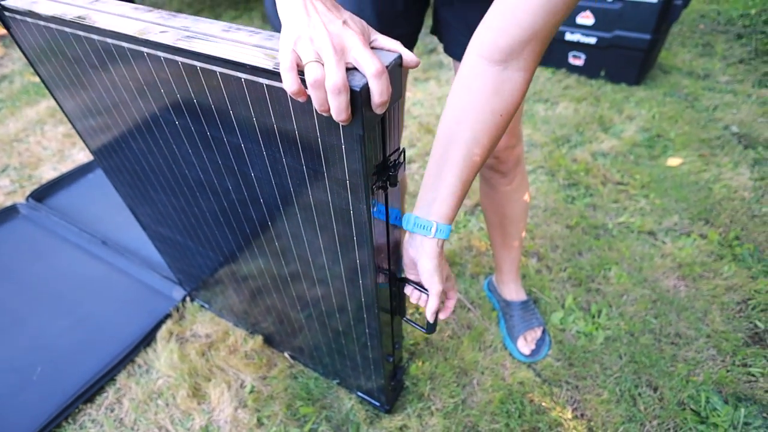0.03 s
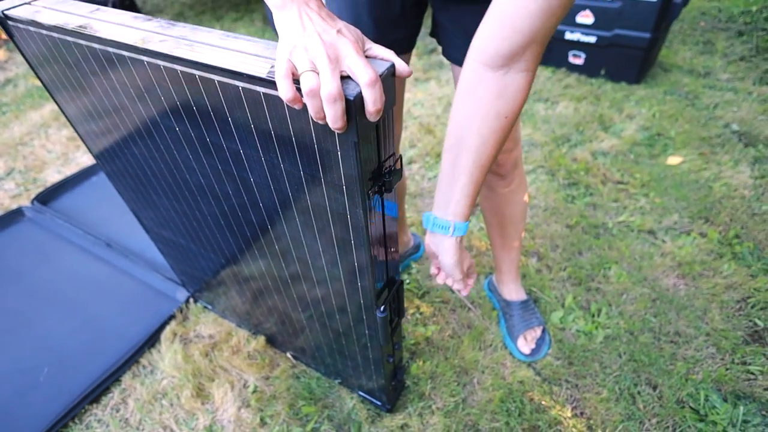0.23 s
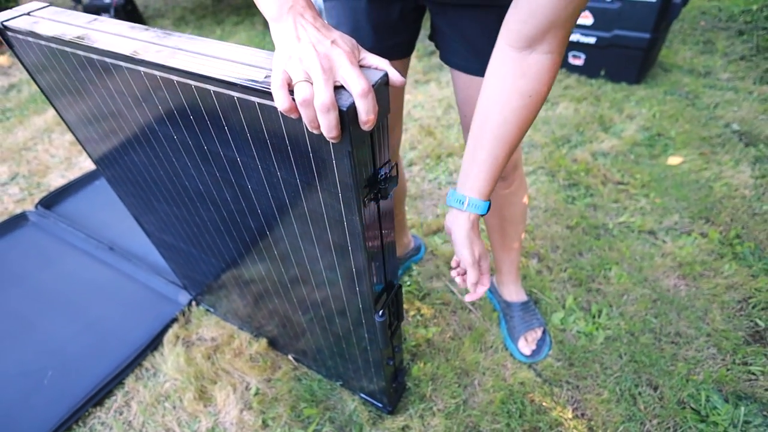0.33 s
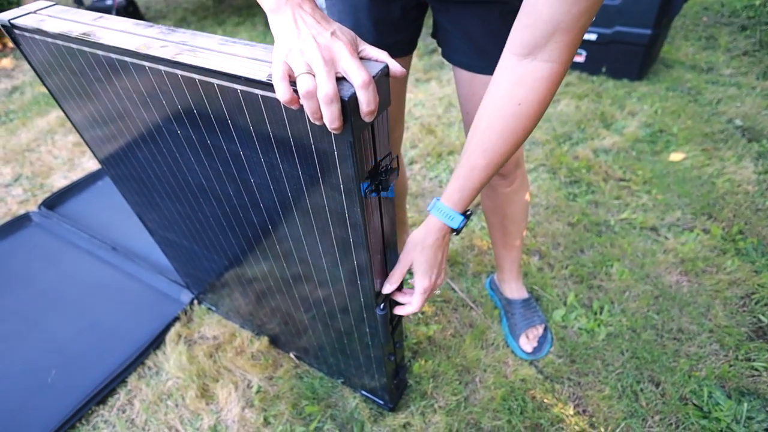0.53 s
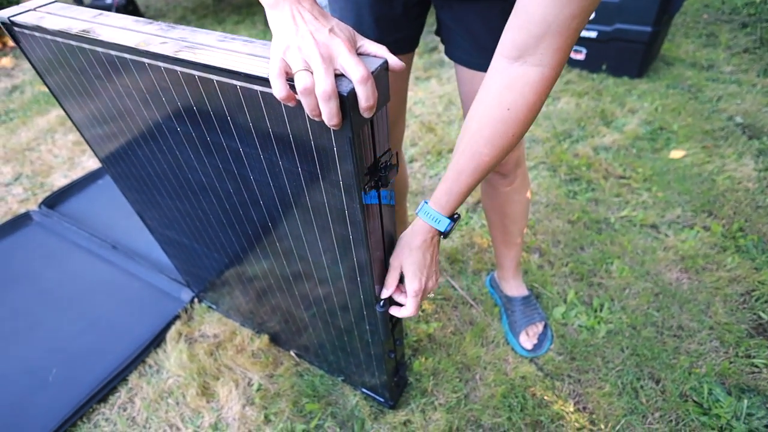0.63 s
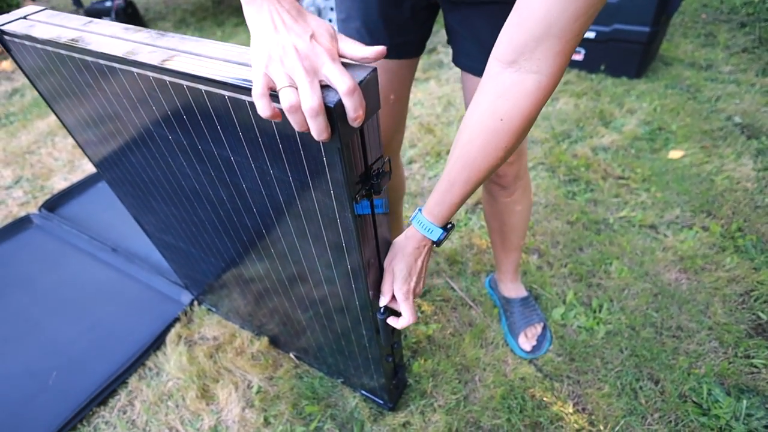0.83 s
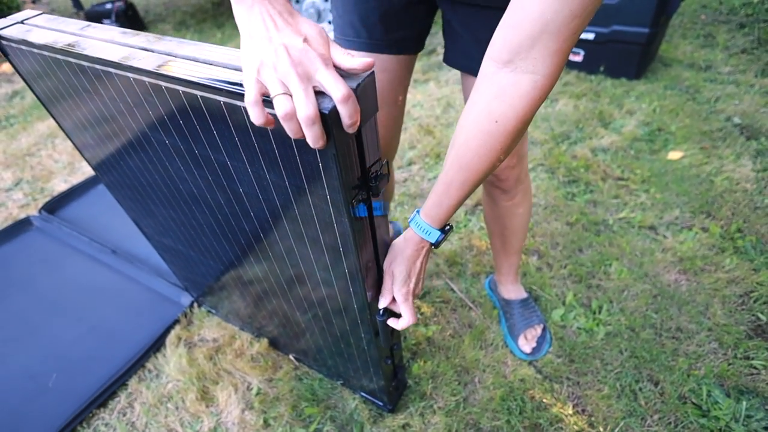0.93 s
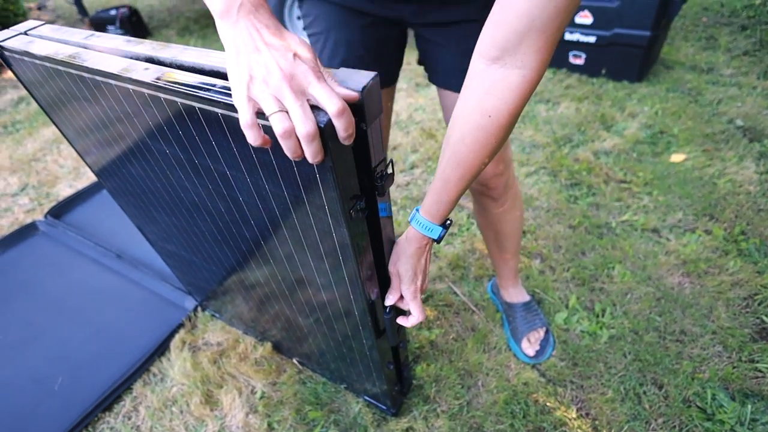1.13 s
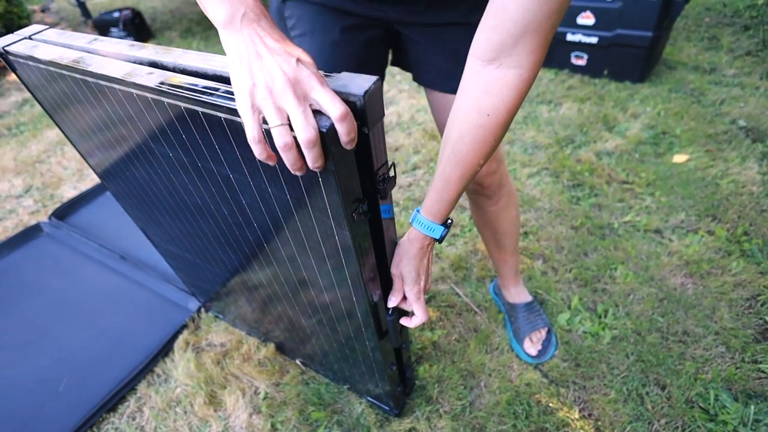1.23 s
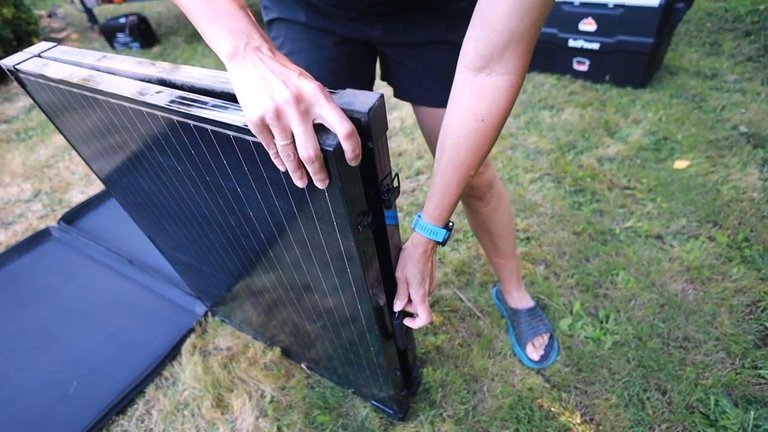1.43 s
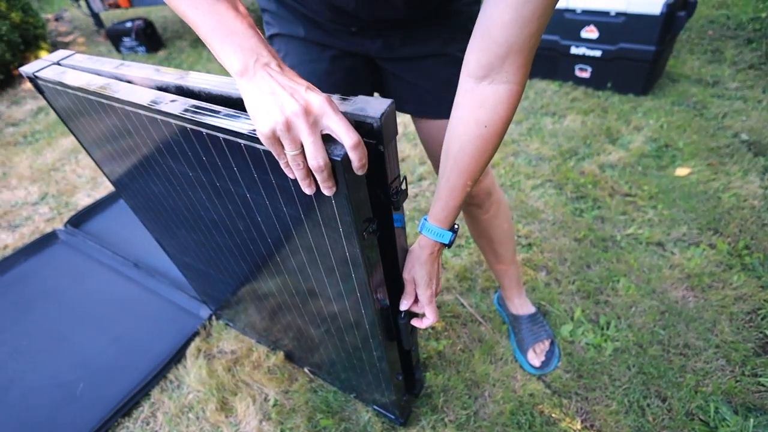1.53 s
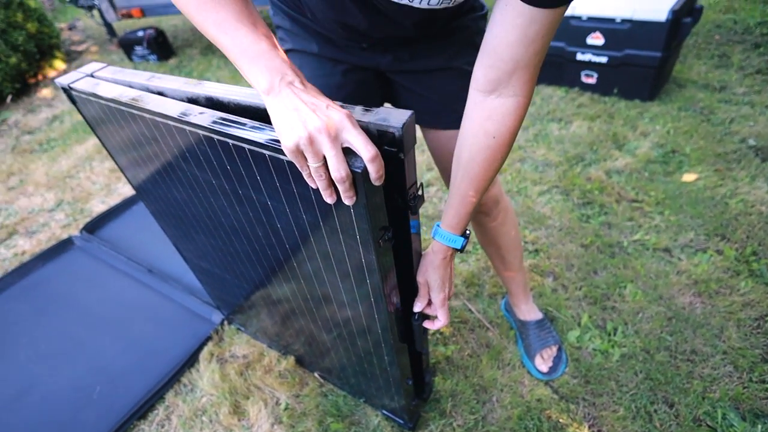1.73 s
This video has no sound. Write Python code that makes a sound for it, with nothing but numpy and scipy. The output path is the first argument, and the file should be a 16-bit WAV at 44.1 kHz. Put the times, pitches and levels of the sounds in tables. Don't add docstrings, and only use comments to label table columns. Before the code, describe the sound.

A latch on a hollow folding panel snaps open, close and dry outdoors. Very soft knocks come first, then at about 0.2 s a loud metallic crack with rapid buzzing clatter, its boxy ring gone by about 0.5 s. Quiet fingertip knocks follow near 0.6, 1.03 and 1.3 s, with faint sliding and grass rustle, then gritty bumps around 1.55-1.7 s. A faint outdoor hush and distant low motor throb continue throughout.

```python
import sys
import numpy as np
from scipy import signal
from scipy.fft import rfft, irfft, next_fast_len
from scipy.io import wavfile

SR = 44100
rng = np.random.default_rng(int(sys.argv[2]) if len(sys.argv) > 2 else 0)


def voltage_ratio(level):
    return 10 ** (np.asarray(level, float) / 20)


def master_out(mix):
    frames = np.transpose(np.atleast_2d(mix))
    ceiling = np.clip(frames, -1, 1)
    pcm = np.round(ceiling * 32767).astype(np.int16)
    wavfile.write(sys.argv[1], SR, pcm)


N = 79380

# (frequency [Hz], level [dB], decay time T60 [s])
PANEL_MODES = [(200, -9, .06), (270, -15, .04), (338, -11, .085), (450, -21, .04), (540, -11, .05),
               (592, -1, .03), (712, -6, .055), (875, -10, .045), (1010, -8, .04), (1100, -9, .035),
               (1318, -10, .055), (1578, -8, .04), (1880, -7, .03), (2200, -8, .025)]


def rms_one(x):
    return x / np.sqrt(np.mean(x ** 2) + 1e-20)


def colour(x, points):
    hz, db = np.transpose(points)
    size = next_fast_len(N + 4096)
    grid = np.maximum(np.arange(size // 2 + 1) * SR / size, 1)
    level = np.interp(np.log(grid), np.log(hz), db)
    level = level - 40 * np.maximum(np.log2(hz[0] / grid), 0)
    cepstrum = irfft(np.log(rms_one(voltage_ratio(np.maximum(level, -90)))), size)
    cepstrum[1:size // 2] *= 2
    cepstrum[size // 2 + 1:] = 0
    return irfft(rfft(x, size) * np.exp(rfft(cepstrum)), size)[:N]


def ring(clicks, hz, t60):
    radius = voltage_ratio(-60 / (t60 * SR))
    angle = 2 * np.pi * hz / SR
    return signal.lfilter([0, np.sin(angle)], [1, -2 * radius * np.cos(angle), radius ** 2], clicks + 1e-18)


def panel_ring(x):
    return sum(voltage_ratio(db) * ring(x, hz, t60) for hz, db, t60 in PANEL_MODES)


def drift(rate):
    r = np.exp(-2 * np.pi * rate / SR)
    noise = rng.standard_normal(N + SR)
    return rms_one(signal.lfilter([1], [1, -2 * r, r * r], noise)[SR:])


def fade_window(start, length, edge):
    t = np.arange(N) / SR
    return np.clip(np.minimum(t - start, start + length - t) / edge, 0, 1)


def place(starts, rows):
    out = np.zeros(N + SR)
    for start, row in zip(starts, rows):
        first = int(start * SR)
        out[first:first + len(row)] += row
    return out[:N]


def body(modes, starts, rows, flip=-1):
    spread_db = 4
    share = voltage_ratio(spread_db * rng.standard_normal((len(starts), len(modes))))
    out = 0
    for k, (hz, db, t60) in enumerate(modes):
        force = place(starts, rows * share[:, [k]])
        out = out + flip ** k * voltage_ratio(db) * ring(force, hz, t60)
    return out


def snap():
    # (time [s], metal level [dB], panel level [dB], chatter T60 [s])
    contacts = [(0.171, -47, -52, 0.044), (0.175, -43, -34, 0.13), (.1795, -56, -48.5, 0.074),
                (.189, -49, -30.5, 0.043), (.194, -35, -21, 0.081), (0.1979, -25.5, -31, .02),
                (0.1994, -25, -31.5, 0.017), (0.203, -28.5, -28, 0.033), (.2068, -28.5, -35, 0.0066),
                (.2078, -17, -20, .012), (.2097, -13, -19, .016), (.2122, -16, -16, .016),
                (0.2272, -32, -21.5, 0.046), (.234, -36.5, -24, 0.032), (.2408, -40, -21, .03),
                (0.2489, -24, -27, 0.02), (0.2505, -21, -26, 0.03), (0.2541, -20.5, -18, 0.0091),
                (.258, -32.5, -19.5, 0.084), (0.2678, -24, -26, 0.021), (0.273, -31, -22.5, 0.039),
                (.286, -42.5, -38.5, 0.042), (.295, -58, -36.5, 0.028), (.326, -64, -55, 0.18)]
    # (frequency [Hz], level [dB], decay time T60 [s])
    metal_modes = [(2560, -2, 0.0045), (3112, -5, .018), (3778, -4.5, 0.017), (3850, -5, 0.017),
                   (4010, -5, 0.0077), (4170, -5, .02), (4900, -10.5, 0.011), (5070, -7, .012),
                   (5980, -18, 0.0046), (6200, -11, 0.0086), (7680, -14.5, 0.0067)]
    # (frequency [Hz], level [dB], decay time T60 [s])
    frame_modes = [(623, -10, 0.025), (735, -13, .03), (950, -7.5, .05), (1170, -6.5, 0.034),
                   (1371, -8, 0.091), (1720, -11, 0.014), (1972, -12.5, 0.043), (2500, -12, 0.041),
                   (2900, -13, 0.044), (3370, -13.5, .04), (3610, -9.5, 0.048), (4500, -10.5, 0.039)]
    # (frequency [Hz], level [dB per Hz])
    crack_spectrum = [(180, -50.5), (400, -18), (592, -8), (895, -7.5), (2300, -20.5), (4180, -17.5),
                      (10000, -32), (15700, -52)]
    k = np.arange(6)
    buzz_time = .2133 + k / 568
    buzz = np.transpose([buzz_time, -17 - 2.2 * k, -11 - 0.88 * k, 0.016 + 0 * k])
    s, metal_db, panel_db, t60 = np.transpose(np.vstack([buzz, contacts]))[:, :, None]
    starts = s[:, 0]

    t = np.arange(SR // 10) / SR
    shape = (len(s), len(t))
    chatter = rng.standard_normal(shape) * (rng.random(shape) < .15) * voltage_ratio(-60 * t / t60)
    click = t == 0
    metal = (click * 1.8 + 0.74 * chatter) * voltage_ratio(metal_db)
    panel = (click + 0.19 * chatter) * voltage_ratio(panel_db)

    hardness = voltage_ratio(.3 * (metal_db + 11))
    crack = colour(place(starts, metal * hardness), crack_spectrum) * voltage_ratio(13)
    out = voltage_ratio(-7) * body(metal_modes, starts, metal) + voltage_ratio(-6.0) * body(PANEL_MODES, starts, panel)
    return out + crack + voltage_ratio(-9) * body(frame_modes, starts, panel)


def tail():
    # (frequency [Hz], level [dB per Hz])
    tail_spectrum = [(88, -47.5), (150, -18.5), (400, -16), (597, -2.5), (1000, -17), (6810, -21.5),
                     (11300, -39.5), (15700, -67)]
    start_s, low_t60_s, high_t60_s = 0.22, 0.27, 0.3
    t = np.maximum(np.arange(N) / SR - start_s, 0)
    noise = colour(rng.standard_normal(N), tail_spectrum)
    noise = noise * voltage_ratio(-28 + 1.1 * drift(43)) * np.minimum(t / 0.034, 1)
    low = signal.sosfilt(signal.butter(2, 1200, fs=SR, output="sos"), noise)
    return low * voltage_ratio(-60 * t / low_t60_s) + (noise - low) * voltage_ratio(-60 * t / high_t60_s)


def grit():
    # (time [s], length [s], level [dB], pitch [Hz])
    bursts = [(.005, 0.026, -67.5, 1480), (.063, 0.017, -70.5, 1390), (0.075, 0.0092, -62.5, 417),
              (1.251, 0.029, -61, 4300), (1.614, 0.016, -56, 2408), (1.085, 0.052, -59.5, 2310),
              (1.435, 0.024, -62, 1007), (1.494, 0.032, -64.5, 686), (1.535, 0.0083, -63, 620),
              (1.553, 0.013, -51.5, 274), (1.57, 0.013, -53, 275), (1.591, 0.013, -49, 840),
              (1.608, 0.014, -57, 2300), (1.634, 0.017, -56.5, 1410), (1.656, 0.011, -45.5, 1400),
              (1.665, .018, -48, 1690), (1.658, .02, -59, 2600), (1.666, 0.024, -51, 750),
              (1.6, .045, -56, 900), (1.684, 0.052, -55.5, 560), (1.783, .03, -63, 675)]
    grains_per_s, edge_s, band_ratio = 5000, 0.0019, 1.567
    grains = rms_one(rng.standard_normal(N) * (rng.random(N) < grains_per_s / SR))
    out = 0
    for s, length, db, hz in bursts:
        burst = grains * voltage_ratio(db) * fade_window(s, length, edge_s)
        band = signal.butter(2, [hz / band_ratio, hz * band_ratio], "band", fs=SR, output="sos")
        out = out + signal.sosfilt(band, burst) * np.sqrt(SR / 4 / hz)
    return out + voltage_ratio(-39.5) * panel_ring(out)


def knocks():
    # (time [s], level [dB])
    blows = [(.006, -62), (0.0159, -44), (.027, -52), (.067, -56), (0.073, -58), (.342, -49.5), (.365, -57),
             (.603, -54), (.6095, -52), (.6255, -40), (.6298, -47), (.637, -48), (.6432, -49.5),
             (0.667, -52), (.689, -61), (.914, -54.5), (1.143, -53.5), (1.228, -61.5), (1.338, -62),
             (1.364, -56), (1.656, -43)]
    # (frequency [Hz], level [dB], decay time T60 [s])
    soft_modes = [(236, -27, 0.064), (340, -9.5, 0.14), (429, -11.5, 0.088), (556, -3.5, 0.048),
                  (714, -2, 0.05)]
    s, db = np.transpose(blows)
    t = np.arange(400) / SR
    push = t * np.exp(-2 * np.pi * 1960 * t)
    forces = push / push.sum() * voltage_ratio(db)[:, None]
    return -body(soft_modes, s, forces, flip=0.94)


def ticks():
    # (time [s], level [dB], pitch [Hz], decay time T60 [s])
    clicks = [(.172, -46, 3600, 0.018), (0.2007, -18, 3920, 0.023), (.2485, -22, 8300, .004),
              (0.2503, -29, 11530, 0.0051), (0.2502, -19.5, 6500, 0.0065), (0.2514, -12, 4300, 0.011),
              (0.2737, -22, 4400, 0.0097), (.289, -43, 10300, .006), (0.2939, -43, 8500, .006),
              (.37, -53, 2500, .03), (.406, -59, 2900, 0.026), (0.4659, -60.5, 12730, 0.046),
              (0.6034, -51, 8500, 0.0026), (0.604, -54, 3326, 0.0034), (0.6258, -44.5, 3540, 0.0036),
              (0.6251, -60, 6500, 0.0035), (0.919, -54, 7960, 0.0027), (1.0306, -40.5, 1240, 0.0077),
              (1.03, -47.5, 514, 0.023), (1.104, -63, 8200, 0.0036), (1.145, -47.5, 1980, 0.0098),
              (1.3229, -42, 3540, 0.0086), (1.3236, -49, 2006, 0.012), (1.3225, -48.5, 6200, 0.0028),
              (1.357, -53, 9480, 0.0032), (1.356, -49, 2010, 0.012), (1.627, -42.5, 1810, 0.031),
              (1.6595, -50.5, 3510, 0.0043), (1.6583, -40, 1000, .012), (1.672, -41, 800, .015),
              (.6295, -54, 4200, .005), (.6455, -58, 3500, .005), (.612, -56, 1800, .012),
              (1.685, -63, 5940, 0.0038), (1.264, -53.5, 4360, 0.014), (1.274, -49.5, 4200, .02)]
    band_ratio = 1.5
    out = 0
    for s, db, hz, t60 in clicks:
        tone = ring(place([s], [[voltage_ratio(db)]]), hz, t60)
        b, a = signal.butter(1, [hz / band_ratio, hz * band_ratio], "band", fs=SR)
        out = out + signal.lfilter(b, a, tone)
    return out


def rubs():
    # (time [s], length [s], level [dB], lower band edge [Hz])
    strokes = [
        (0.14, 0.067, -69.5, 2200),
        (0.244, 0.049, -47.5, 6900),
        (0.463, 0.01, -61, 6960),
        (0.862, 0.057, -75, 4500),
        (0.973, 0.034, -82.5, 5000),
        (1.092, 0.041, -73.5, 1820),
        (1.237, 0.054, -64.5, 3100),
        (1.355, 0.013, -57, 6500),
        (1.679, 0.015, -61.5, 3970),
        (1.785, 0.03, -58, 1970),
    ]
    grain = rms_one(rng.standard_normal(N) * voltage_ratio(1.0 * drift(330)))
    metal = sum(ring(grain, hz, 0.0029) for hz in (3800, 4200, 4674, 6500, 9950))
    grain = grain + 0.54 * rms_one(metal)
    out = 0
    for s, length, db, low_hz in strokes:
        band = signal.butter(2, [low_hz, 8900 + low_hz / 2], "band", fs=SR, output="sos")
        hiss = rms_one(signal.sosfilt(band, grain))
        out = out + voltage_ratio(db) * hiss * fade_window(s, length, 0.013)
    return out


def slides():
    # (time [s], length [s], level [dB], resonance [Hz], decay time T60 [s])
    strokes = [
        (.4, .12, -78, 2600, .004),
        (.56, .3, -76, 2150, .006),
        (.7, .33, -77, 4900, .002),
        (.74, .2, -77, 3800, .003),
        (1.24, .045, -64, 4400, .002),
        (1.28, .32, -70, 3600, .002),
        (.72, .36, -71, 320, .04),
    ]
    noise = rng.standard_normal(N) * voltage_ratio(2.5 * drift(30))
    out = 0
    for s, length, db, hz, t60 in strokes:
        band = rms_one(ring(ring(noise, hz, t60), hz, t60))
        out = out + voltage_ratio(db) * band * fade_window(s, length, .03)
    return out


def drag():
    # (time [s], level [dB])
    course = [(.53, -100.5), (.6, -69), (.71, -74.5), (.76, -71.5), (0.919, -69), (1.019, -68.5),
              (1.199, -67.5), (1.3, -65.5), (1.399, -65), (1.55, -61), (1.692, -59), (1.725, -92),
              (1.77, -84)]
    # (frequency [Hz], level [dB per Hz])
    grass_spectrum = [(88, -24.5), (150, -20), (244, -2.5), (421, -11.5), (698, -4), (2000, -13),
                      (2290, -13.5), (3650, -13.5), (15700, -40.5)]
    blades_per_s, blade_spread_db = 3000, 4
    s, db = np.transpose(course)
    level = voltage_ratio(np.interp(np.arange(N) / SR, s, db) + 4 + drift(22))
    sizes = voltage_ratio(blade_spread_db * np.minimum(rng.exponential(1, N), 4)) * rng.choice([-1, 1], N)
    flicks = rms_one(sizes * (rng.random(N) < blades_per_s / SR))
    blades = level * rms_one(flicks + 1.6 * rng.standard_normal(N))
    through = panel_ring(blades)
    return colour(blades, grass_spectrum) + voltage_ratio(-15.5) * through * np.std(blades) / np.std(through)


def hush():
    # (frequency [Hz], level [dB per Hz])
    hush_spectrum = [(50, -12.5), (130, -13), (500, -9.5), (1090, -22.5), (2580, -25.5), (5000, -31),
                     (12000, -43.5), (15700, -56)]
    # (multiple of the rate [1], level [dB])
    harmonics = [(3, -80.5), (4, -73.5), (5, -86), (6, -87), (8, -87.5)]
    motor_hz, pulse_s = 24.1, 0.99
    phase = 2 * np.pi * (motor_hz * (np.arange(N) / SR - pulse_s) + 0.029 * drift(2.5))
    motor = sum(voltage_ratio(db + 0.5 + 2.0 * drift(1.8)) * np.cos(k * phase) for k, db in harmonics)
    noise = rms_one(colour(rng.standard_normal(N), hush_spectrum))
    return voltage_ratio(-68.5 + 0.96 * drift(15)) * noise + motor


def scene():
    case = snap() + tail() + grit() + knocks() + ticks() + rubs() + slides() + drag()
    high_pass = signal.butter(6, 168, "high", fs=SR, output="sos")
    return (signal.sosfilt(high_pass, case) + hush())[None]


def low_pass(x):
    return signal.sosfilt(signal.butter(12, 15870, fs=SR, output="sos"), x)


def record(dry):
    rounded = 3 * np.tanh(dry / 3)
    cut = signal.sosfilt(signal.butter(4, 58, "high", fs=SR, output="sos"), rounded)
    cut = signal.sosfilt(signal.cheby2(20, 50, 15950, fs=SR, output="sos"), cut)
    return low_pass(cut)


dry = scene()
out = record(dry)
master_out(out)
```